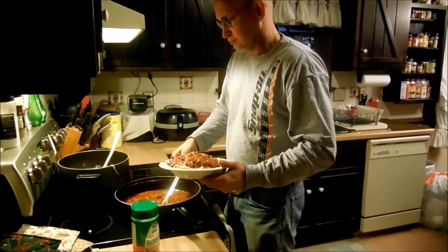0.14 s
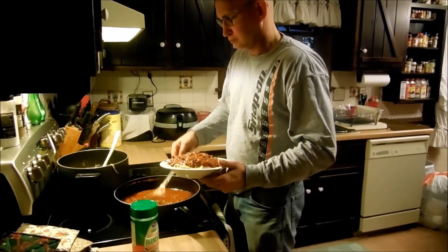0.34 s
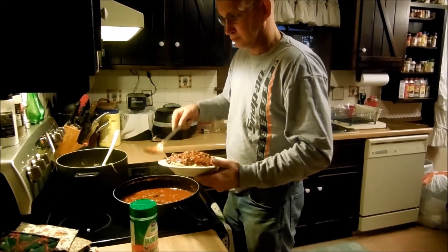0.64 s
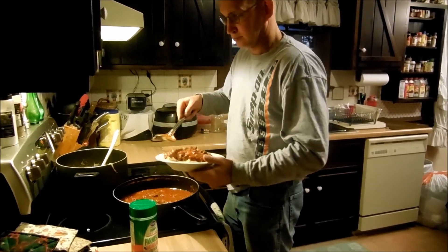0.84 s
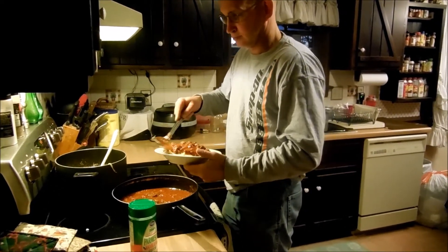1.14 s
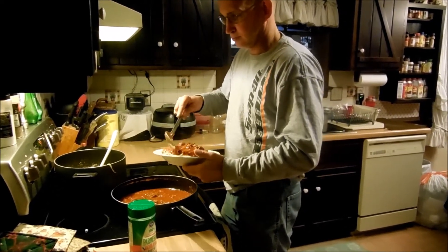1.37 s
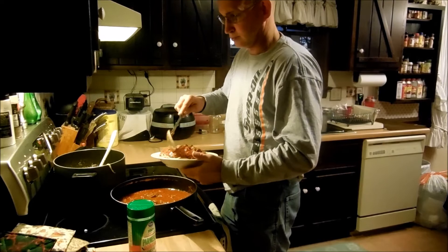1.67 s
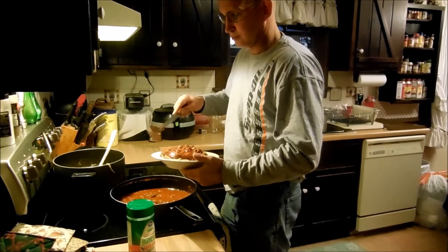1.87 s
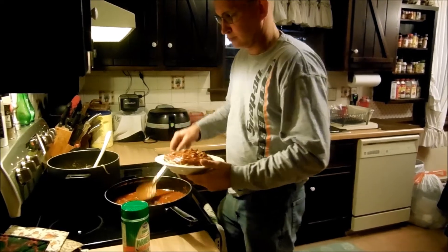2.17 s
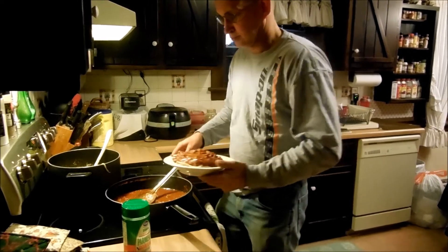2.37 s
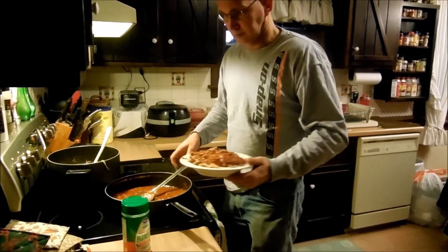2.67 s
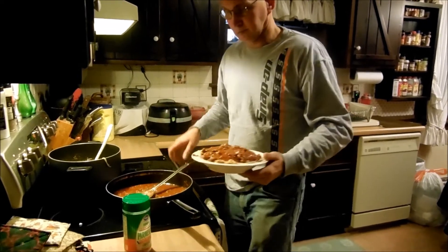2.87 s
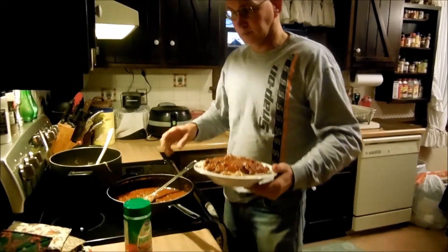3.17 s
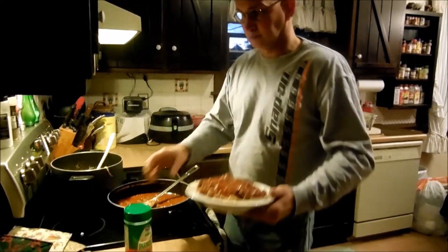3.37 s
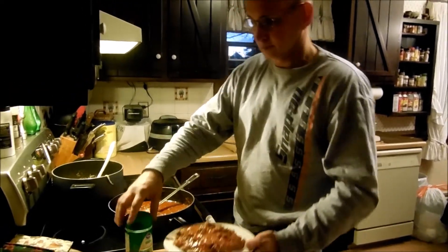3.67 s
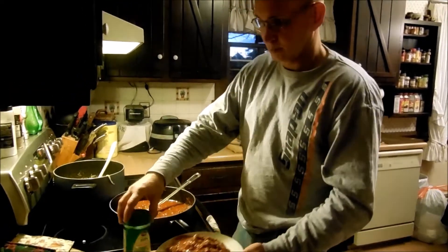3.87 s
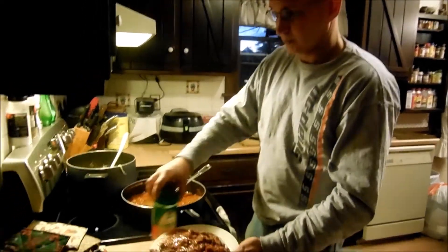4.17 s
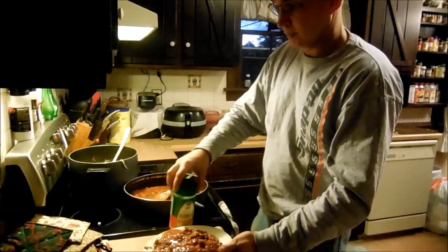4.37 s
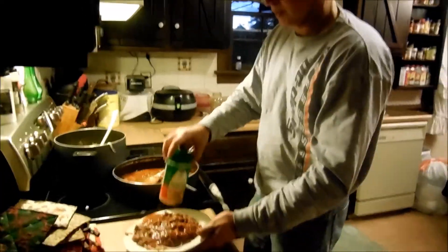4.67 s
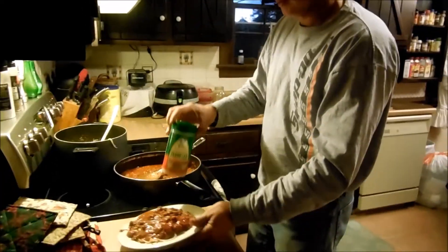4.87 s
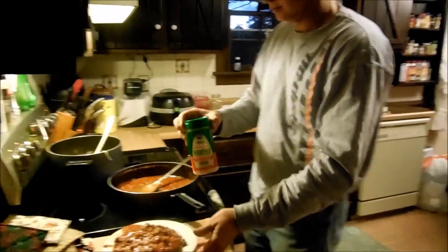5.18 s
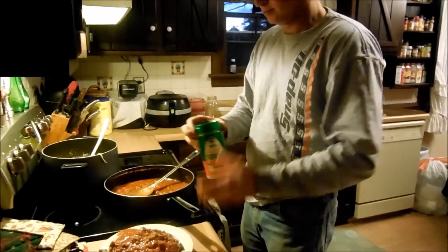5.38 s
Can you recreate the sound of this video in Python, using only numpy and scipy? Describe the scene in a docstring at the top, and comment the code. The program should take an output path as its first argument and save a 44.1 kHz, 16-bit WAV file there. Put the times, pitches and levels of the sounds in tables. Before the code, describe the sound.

Close stereo pickup of serving food at a stove. Soft rubbing and a low pan knock come first, followed by a metallic ring, a pause with tiny ticks, and a light spoon rattle. The second half is louder: double plate clink, shaker bump, brief lid scrape, counter knocks, then a board thud. Constant fan hum and rushing air, with short reflections from the walls.

```python
"""A spoon knocks and rings on a saucepan, then rattles on its rim, in a small kitchen.
A plate clinks and slides, a shaker bumps and its lid scrapes, and things land on counter and board.
Each blow sounds an object's own tones over a burst of dense noise; rubbing is a run of tiny blows.
Small ticks fall between and the walls throw everything back. Behind it a three-bladed fan hums:
steady tones locked to its shaft and the mains, over rushing air."""
import sys
import numpy as np
from scipy import signal
from scipy.fft import rfft, irfft, next_fast_len
from scipy.io import wavfile

SR = 44100
rng = np.random.default_rng(int(sys.argv[2]) if len(sys.argv) > 2 else 0)


def store_wav(level_fs):
    """Save 16-bit WAV to argv[1]."""
    pcm = np.round(np.clip(np.atleast_2d(level_fs), -1, 1) * 32767)
    wavfile.write(sys.argv[1], SR, pcm.T.astype(np.int16))


N = 243423  # length in samples


def amp(db):
    """Turns decibels into a plain multiplier."""
    return 10 ** (np.asarray(db) / 20)


def evened(x):
    """Scales a signal to an average (rms) strength of 1."""
    return x / np.sqrt(np.mean(x ** 2) + 1e-20)


def read(points, hz):
    """Reads a curve between its points, along a logarithmic pitch scale."""
    f, value = np.transpose(points)
    return np.interp(np.log(hz + 1), np.log(f + 1), value)


def add(mix, s, sound):
    """Adds a sound to the mix from s seconds on, cut at the end of the mix."""
    part = mix[:, round(s * SR):][:, :sound.shape[1]]
    part += sound[:, :part.shape[1]]


def coloured(x, db_at):
    """Filters along the last axis by a gain in dB given as a function of Hz."""
    size = next_fast_len(x.shape[-1])
    gain = amp(db_at(np.fft.rfftfreq(size, 1 / SR)))
    return irfft(rfft(x, size) * gain, size)[..., :x.shape[-1]]


# How alike spread-out sound is on left and right. Each row: pitch in Hz, likeness from 0 to 1.
LIKENESS = [(60, 0.89), (300, 0.93), (700, 0.87), (1400, 0.74), (3100, 0.31), (6800, .02)]


def paired(x):
    """Makes two unrelated signals alike in the bass and apart in the treble."""
    same = read(LIKENESS, np.fft.rfftfreq(x.shape[1], 1 / SR))
    a, b = rfft(x)
    return irfft(np.array([a, same * a + np.sqrt(1 - same ** 2) * b]), x.shape[1])


# An object's body has four parts: its single tones, the spectrum of the dense tones between them,
# the level of those dense tones in dB against the single ones, and their ring time in seconds.
# Ring time is the time to fall by 60 dB; each blow or rub takes its own share of it.

# The saucepan's single tones. Each row: pitch in Hz, level in dB, ring time in seconds.
PAN_TONES = [(748, -13., .5), (1200, -3., .55), (1647, -7., .55), (2105, -6., .075), (2439, -10., .25),
             (2509, -9., .25), (2616, -5., .3), (2720, -2., .08), (2848, -3., .25), (3160, -5., .12),
             (4527, -18., .1), (5243, -16., .12)]
# The rest of the pan: dense spectrum (pitch in Hz, level in dB), dense level in dB, ring time in s.
PAN_DENSE = ([(88, -47), (150, -20), (753, -2.5), (1020, -15), (1190, -5), (2260, -33), (2690, -11.5),
              (4230, -20), (5220, -25), (14000, -60)], 2.1, 0.1)


def pan():
    """The saucepan rings long, with many separate metal tones."""
    return play("pan", (PAN_TONES, *PAN_DENSE))


# The pan struck under the sauce: tones (pitch in Hz, level in dB, ring time in s),
# dense spectrum (pitch in Hz, level in dB), dense level in dB, dense ring time in s.
FULL_PAN_BODY = ([(270, -10, 0.091), (625, -10, 0.11), (1028, -8., 0.08), (1310, -1.5, 0.049),
                  (1602, -6, 0.12), (2660, -17, 0.041), (3600, -13.5, 0.023)], [(71, -47), (120, -7),
                  (503, 0), (614, 2.5), (845, -13), (1280, -9), (1420, 3.5), (1600, -19), (2110, -22),
                  (3080, -12.5), (14000, -60)], 3.5, 0.04)


def full_pan():
    """The pan struck under the sauce gives a lower, shorter knock."""
    return play("full pan", FULL_PAN_BODY)


# The spoon: tones (pitch in Hz, level in dB, ring time in s),
# dense spectrum (pitch in Hz, level in dB), dense level in dB, dense ring time in s.
SPOON_BODY = ([(600, -6.5, 0.3), (1230, 5.5, 0.045), (1440, -26, 0.049), (1867, -8, 0.14),
               (2374, -7.5, 0.17), (2660, -7, 0.072), (2974, 3, 0.047), (3280, -1, 0.046),
               (3380, -17, 0.093), (4210, -14, 0.16), (4880, -7, 0.059), (5150, -5, 0.05), (6080, -5, 0.04),
               (7540, -6, 0.059)], [(88, -13), (150, 4), (359, -25), (611, 4.5), (725, -18), (1000, -23),
               (1260, -0.5), (2220, -12.5), (2790, -4), (3500, -4), (3780, -24), (6310, -14),
               (11600, -19.5), (14000, -38)], 0.8, 0.051)


def spoon():
    """The spoon rattles on the rim with short, bright metal tones."""
    return play("spoon", SPOON_BODY)


# The plate's single tones. Each row: pitch in Hz, level in dB, ring time in seconds.
PLATE_TONES = [(716, -12., .1), (1017, -19., .2), (1334, -10., .1), (1510, -8., .15), (1575, -7., .2),
               (1895, -4., .2), (2367, -12., .1), (2634, -2., .5), (2712, -8., .3), (2748, -3., .42),
               (3090, -8., .15), (3838, -12., .08), (4300, -9., .45), (5717, -11., .07), (6880, -10., .06),
               (8500, -18., .04)]
# The rest of the plate: dense spectrum (pitch in Hz, level in dB), dense level in dB, ring time in s.
PLATE_DENSE = ([(88, -57.5), (150, -40), (402, -31.5), (711, -7.5), (844, -29), (1040, -10), (2400, -9.5),
                (2690, -2), (3440, -12), (4320, -14.5), (12300, -33), (14000, -41)], 0.6, 0.25)


def plate():
    """The plate clinks with many separate tones, and slides."""
    return play("plate", (PLATE_TONES, *PLATE_DENSE))


# The shaker: tones (pitch in Hz, level in dB, ring time in s),
# dense spectrum (pitch in Hz, level in dB), dense level in dB, dense ring time in s.
SHAKER_BODY = ([(627, -3.5, 0.13), (1292, -3, 0.12), (1568, -2, 0.071), (2550, -10, .05),
                (3230, -2.5, 0.032), (3950, -8, .03)], [(59, -49), (100, -16), (670, -4), (1300, -9.5),
                (1440, -8), (1560, -5), (1810, -16.5), (3290, -14), (8700, -33), (14000, -56)], 3.5, 0.064)


def shaker():
    """The shaker bumps: short tones under a stronger crowd of dense ones."""
    return play("shaker", SHAKER_BODY)


# The shaker's lid: tones (pitch in Hz, level in dB, ring time in s),
# dense spectrum (pitch in Hz, level in dB), dense level in dB, dense ring time in s.
LID_BODY = ([(1290, -1, 0.022), (3000, -1, 0.022), (5650, -3, 0.045), (7140, -12, 0.025), (9070, -8, .03),
             (9800, -13., 0.04), (12600, -10, 0.037)], [(71, -37), (120, -8), (537, -7.5), (655, -10),
             (724, 0), (1240, -2), (2090, -8.5), (3050, -7), (4030, -10.5), (5440, -7.5), (12600, -16),
             (14200, -27)], 5.9, 0.033)


def lid():
    """The lid scrapes: mostly dense noise, gone in a few hundredths of a second."""
    return play("lid", LID_BODY)


# The counter: tones (pitch in Hz, level in dB, ring time in s),
# dense spectrum (pitch in Hz, level in dB), dense level in dB, dense ring time in s.
COUNTER_BODY = ([(257, -7.5, 0.25), (440, -31, 0.071), (790, -39, 0.13), (806, 0.5, 0.26),
                 (910.5, -6.5, 0.27), (1079, -5, 0.19), (1261, -11.5, 0.27), (1454, -10, 0.17),
                 (1740, -18, 0.21), (2120, -15.5, 0.16), (2260, -21, 0.16), (2475, -9, 0.08),
                 (2552, 0, 0.052), (4300, -16.5, .1)], [(59, -53), (100, -61), (233, -20.5), (684, -6),
                 (807, -12), (993, -11.5), (1270, -6), (2090, -23.5), (2410, -21), (11600, -41.5),
                 (14000, -59)], 0.5, 0.25)


def counter():
    """Things set down on the counter give a dull knock."""
    return play("counter", COUNTER_BODY)


# The board: tones (pitch in Hz, level in dB, ring time in s),
# dense spectrum (pitch in Hz, level in dB), dense level in dB, dense ring time in s.
BOARD_BODY = ([(224, -15, 0.3), (515, -5, 0.22), (589, -10, 0.16), (730, -4, 0.08), (858, -2, 0.088),
               (932, -4, 0.13), (1236, -16.5, 0.22), (1570, -5.5, 0.088), (1565, -6, 0.093),
               (2030, -21, 0.11), (2530, -29, 0.13), (3080, -14, 0.1), (4544, -18.5, 0.11)], [(59, -67),
               (100, -60), (224, -3.5), (376, -35), (491, -9), (728, -6.5), (1120, -15), (1600, -16),
               (1810, -16.5), (4580, -34), (14000, -59)], 1.4, 0.22)


def board():
    """Things set down on the board give a dull, low knock."""
    return play("board", BOARD_BODY)


# Noise of a tick. Each row: multiple of the tick's pitch, level in dB.
CRUMB_NOISE = [(.1, -18.), (.35, -9), (1.1, 10), (2.2, -4.5), (4., -14)]
# Each row: start in seconds, level in dB (before the cut in strikes), pitch in Hz, ring time in seconds,
# hardness in dB per octave, left minus right in dB.
TICK_ROWS = [(2.4556, -41, 3920, 0.022, 2.5, 8), (2.768, -49, 3940, 0.03, -3, -4),
             (3.3375, -46, 3800, 0.015, -6, -1.1), (3.8382, -35, 2590, .025, -4, -1.1),
             (4.2557, -47.5, 5530, 0.024, -1.5, 1.1), (5.028, -48, 6600, .006, .1, 1.5),
             (5.0432, -29., 6640, 0.005, -1.5, 1.5)]


def ticks():
    """Tiny contacts: each has one short tone, and noise that follows its pitch."""
    out = np.zeros((2, N))
    for s, db, hz, t60, hard_db, pan_db in TICK_ROWS:
        noise = [(k * hz, level_db) for k, level_db in CRUMB_NOISE]
        crumb = [(hz, -3., t60)], noise, 4., t60
        out += strikes(crumb, [(s, db, hard_db, 1, pan_db)])
    return out


# The rustle: tones (pitch in Hz, level in dB, ring time in s),
# dense spectrum (pitch in Hz, level in dB), dense level in dB, dense ring time in s.
RUSTLE_BODY = ([(9200, -3., .03), (7300, -3., .02)], [(2000, -20.), (4500, -1), (8500, 3), (13000, -12)],
                9., .012)


def rustle():
    """A faint bright rustle, made of rubbing alone."""
    return play("rustle", RUSTLE_BODY)


def play(name, body):
    """All that one object does: its blows and its rubbing."""
    return blows(name, body) + rubs(name, body)


# Each row: object, start in seconds, level in dB (before the cut in strikes), hardness in dB per octave,
# share of ring time, left minus right in dB.
BLOW_ROWS = [("full pan", 0.4146, -17, 1.1, 0.51, 0.74), ("full pan", .4285, -22, -1.1, 0.17, 1.5),
             ("pan", 0.6263, -22.5, 2.6, 0.76, -1.1), ("spoon", 3.0095, -26.5, .7, 1.01, .3),
             ("plate", 4.0043, -6.5, 2.2, 0.29, -.51), ("plate", 4.0776, -8.5, -1.6, 0.27, 0.36),
             ("board", 4.3205, -39, 0.49, 0.19, 1.6), ("plate", 4.427, -41, -10.5, 0.7, 1.5),
             ("shaker", 4.5139, -8, 2.5, 0.6, 0.33), ("shaker", 4.527, -16, -1.1, 0.85, 1.2),
             ("counter", 4.7865, -4.5, -0.6, 0.48, 1.1), ("counter", 4.8, -12, -2.1, 0.51, 1.1),
             ("counter", 4.874, -13, -2.1, 0.38, 1.1), ("board", 5.3225, -22, -1.2, 0.37, 0.76),
             ("board", 5.3528, -7, 0.4, 0.51, 0.51), ("board", 5.372, -10.5, -1.7, 0.44, 1.1)]


def blows(name, body):
    """The single strikes on one object."""
    return strikes(body, [row[1:] for row in BLOW_ROWS if row[0] == name])


def strikes(body, rows):
    """Lets a body ring once for each row, leaning left or right."""
    out = np.zeros((2, N))
    for s, db, hard_db, damp, pan_db in rows:
        side_db = np.array([[pan_db / 2], [-pan_db / 2]])
        level_db = db - 5.0 + side_db  # all strikes are cut by 5 dB
        add(out, s, amp(level_db) * ring(body, hard_db, damp))
    return out


# Each row: object, start in seconds, swell in seconds, fade in seconds, peak level in dB,
# level at the end of the fade in dB against the peak, hardness in dB per octave.
RUB_ROWS = [("rustle", 0.0, 0, .3, -63, -6, .2), ("full pan", .02, .018, .03, -50.5, -17, .4),
            ("full pan", .17, .065, .07, -49, -13, 3.2), ("full pan", .416, 0, .018, -28.5, -1.5, -.6),
            ("spoon", 3.008, .03, .022, -28, -18, .6), ("spoon", 3.055, 0, .09, -43, -6, -3.5),
            ("board", 3.338, .012, .03, -46, -18, 1.8), ("plate", 4.015, 0, .06, -21.5, -10.5, .6),
            ("plate", 4.085, 0, .054, -24, -12, -.6), ("board", 4.325, 0, .035, -39, -8, -8.5),
            ("plate", 4.4, .03, .02, -53, -11, 1.5), ("lid", 4.555, .02, .07, -23, -19, -.5),
            ("counter", 4.82, 0, .05, -22, -14, -1.1), ("counter", 4.885, 0, .045, -27, -18, -1.5),
            ("board", 5.22, .06, .03, -44, -1.5, .4), ("board", 5.38, 0, .05, -20.5, -27, .48)]
# For each rubbed object: slips per second, spread of their size in dB, share of ring time left.
SURFACES = {"full pan": (900, 2.5, .31), "spoon": (1400, .73, .53), "plate": (2500, 2.8, .043),
            "lid": (2000, 3.6, .68), "counter": (990, 3.2, .55), "board": (900, 3.2, .15),
            "rustle": (3000, 2.5, .9)}
SWELL_DB = -8.5  # a swell starts this far under its peak


def rubs(name, body, spots=4):
    """Uneven slips and bounces land on a few spots of an object that the contact damps."""
    out = np.zeros((2, N))
    for s, swell, fade, peak_db, fade_db, hard_db in [row[1:] for row in RUB_ROWS if row[0] == name]:
        slips_per_s, spread_db, damp = SURFACES[name]
        t = np.arange(0, swell + fade, 1 / SR)
        level_db = peak_db + np.interp(t, [0, swell, t[-1]], [SWELL_DB, 0, fade_db])
        slipping = rng.random(len(t)) < slips_per_s / SR
        size = np.minimum(rng.exponential(1, len(t)), 3)
        spot = rng.integers(0, spots, len(t))
        slips = evened(slipping * amp(spread_db * size))
        push = slips * amp(level_db) * signal.windows.tukey(len(t), .15)
        for k in range(spots):
            answer = ring(body, hard_db, damp)[:, :SR // 5]
            answer = answer / np.linalg.norm(answer[0])
            add(out, s, signal.fftconvolve((push * (spot == k))[None], answer, axes=1))
    return out


def ring(body, hard_db, damp):
    """One blow's answer at both microphones: single tones, unevenly struck, over a dying dense crowd."""
    modes, dense, dense_db, dense_t60 = body
    t = np.arange(SR // 3) / SR

    def hardness(hz):
        """Tilts the level towards treble (hard) or bass (soft), around 1500 Hz."""
        return hard_db * np.log2(np.maximum(hz, 60) / 1500)

    tones = np.zeros((2, len(t)))
    for hz, db, t60 in modes:
        spot_db, skew, turn = rng.standard_normal(3)
        level_db = db + hardness(hz) + spot_db  # where the blow lands favours some modes
        lag = np.array([[0], [skew * hz / 7000]]) + turn  # high modes beam unevenly at the two sides
        tones += amp(level_db - 60 * t / (damp * t60)) * np.sin(2 * np.pi * hz * t + lag)

    noise = rng.standard_normal((2, len(t)))
    crowd = coloured(paired(noise) + 0.82 * noise[0], lambda hz: read(dense, hz) + hardness(hz))
    dull = signal.lfilter([.25], [1, -.75], crowd)
    fall_db = -60 * t / (damp * dense_t60)
    crowd = dull * amp(fall_db) + (crowd - dull) * amp(1.61 * fall_db)  # the treble dies sooner
    crowd += amp(-1.5) * (crowd - dull) * np.exp(-t / .0015)  # the first crack of contact

    start = SR // 200  # levels are set by the first 5 ms
    both = tones / np.std(tones[:, :start]) + amp(dense_db) * crowd / np.std(crowd[:, :start])
    return both * np.minimum(t / 0.00048, 1) / np.std(both[:, :start])


# Time for echoes to fall by 60 dB. Each row: pitch in Hz, time in seconds.
ECHO_TIMES = [(150, 0.34), (600, 0.29), (2000, 0.27), (6000, 0.24), (13000, 0.17)]


def kitchen(x):
    """Echoes off the walls: sparse taps of random sign, each band dying at its own speed."""
    first = 160  # samples before the first echo
    taps = np.zeros((2, SR // 2))
    at = np.arange(first, SR // 2 - 20, 20)
    at = at + rng.integers(0, 20, (2, len(at)))
    np.put_along_axis(taps, at, rng.choice([-1., 1.], at.shape), 1)
    hz, t, bands = signal.stft(paired(taps), SR, nperseg=256)
    fading = bands * amp(-60 * t / read(ECHO_TIMES, hz)[:, None])
    tail = signal.istft(fading, SR, nperseg=256)[1]
    tail[:, :first] = 0
    return signal.fftconvolve(x.mean(0)[None], tail / np.linalg.norm(tail[0]), axes=1)[:, :N]


# Hum of the mains. Each row: pitch in Hz, rms level in dB.
MAINS_TONES = [(60., -78.), (120., -66.)]
# Tones of the turning shaft. Each row: multiple of the shaft speed, rms level in dB.
SHAFT_TONES = [(2, -66), (3, -63), (4, -62), (5, -73), (6, -69), (7, -74), (8, -75), (11, -78), (13, -74),
               (14, -72), (15, -70), (16, -64), (18, -75), (19, -66), (20, -75), (22, -71)]
# Loudest tones one magnetic pull away from a shaft multiple.
# Each row: shaft multiple, side (-1 below or 1 above), rms level in dB.
SIDE_TONES = [(2, 1, -71), (12, 1, -68), (13, 1, -74), (14, -1, -72), (14, 1, -74), (15, 1, -73),
              (17, -1, -66), (18, -1, -75), (18, 1, -75), (19, -1, -73), (19, 1, -73), (20, -1, -75)]
# Colour of the rushing air. Each row: pitch in Hz, level in dB per Hz, before the whole is set to AIR_DB.
AIR_COLOUR = [(12, -50), (20, -14.5), (115, -8.5), (300, -5.5), (353, -4.5), (416, -9), (547, -8),
              (681, -6), (946, -8), (1030, -13), (1470, -13), (1630, -9), (3420, -22), (11400, -32),
              (13800, -46)]
# Steep loss of treble above 13.6 kHz, applied to the air and again to the whole mix.
# Each row: pitch in Hz, gain in dB.
TREBLE_LOSS = [(13600, 0.), (14100, -16.), (16000, -22.)]
SHAFT_HZ, BLADES = 43.07, 3
PULL_HZ, PULL_TURNS = 120., .11  # magnetic pull of the mains, and its lead in turns
FAINT_FROM, FAINT_TO = 5, 21  # these shaft multiples carry weak side tones wherever no loud one is listed
FAINT_DB, FAINT_SPREAD_DB = -81, 2.5
AIR_DB = -54.5  # rms level


def fan():
    """Shaft multiples with mains side tones, over rushing air that throbs nine times a second."""
    t = np.arange(N) / SR
    shaft = 2 * np.pi * SHAFT_HZ * t
    pull = 2 * np.pi * (PULL_HZ * t + PULL_TURNS)
    blade = rng.uniform(0, 2 * np.pi, BLADES)

    loud = [(k, side) for k, side, db in SIDE_TONES]
    faint = []
    for k in range(FAINT_FROM, FAINT_TO + 1):
        for side in (-1, 1):
            if (k, side) not in loud:
                faint.append((k, side, FAINT_DB + FAINT_SPREAD_DB * rng.standard_normal()))

    tones = sum(amp(db) * np.cos(2 * np.pi * hz * t) for hz, db in MAINS_TONES)
    for k, side, level_db in [(k, 0, db) for k, db in SHAFT_TONES] + SIDE_TONES + faint:
        phase = blade[k % BLADES] + 0.93 * rng.standard_normal()
        tones += amp(level_db) * np.cos(k * shaft + side * pull + phase)

    air = paired(rng.standard_normal((2, N)))
    air = coloured(air, lambda hz: read(AIR_COLOUR, np.minimum(hz, 12000)) + read(TREBLE_LOSS, hz))
    air = amp(AIR_DB) * evened(air)
    throb = 0.18 * np.cos(BLADES * shaft - pull - 1.5)  # three shaft turns against one pull: 9 Hz
    throb += 0.043 * np.cos(shaft) + 0.089 * np.cos(2 * shaft)
    housing_colour = [(500, -41.0), (1200, -2.0), (2800, -9.5), (5000, -20.)]  # Hz, dB
    housing = coloured(air, lambda hz: read(housing_colour, hz))
    left, right = np.sqrt(2) * tones + air + throb * housing  # the housing buzzes in step with the throb
    return np.array([left, np.roll(right, 1)])  # the fan stands further left


# Places with their own echoes. Each row: names of the objects there, echo level in dB.
PLACE_ROWS = [(("pan", "full pan"), -8), (("counter",), -8), (("spoon", "plate"), -9), (("shaker", "lid"),
              -6), (("board",), -8.5), (("rustle", "ticks"), -9.5)]


def scene():
    """Each place rings with its own echoes, over the fan."""
    sources = {"pan": pan, "full pan": full_pan, "spoon": spoon, "plate": plate, "shaker": shaker,
               "lid": lid, "counter": counter, "board": board, "ticks": ticks, "rustle": rustle}
    clatter = np.zeros((2, N))
    for names, echo_db in PLACE_ROWS:
        part = sum(sources[name]() for name in names)
        clatter += part + amp(echo_db) * kitchen(part)
    no_bass = signal.butter(3, 173, "high", fs=SR, output="sos")  # small things radiate no deep bass
    return signal.sosfilt(no_bass, clatter) + fan()


# Balance of the microphone pair. Each row: pitch in Hz, left minus right in dB.
BALANCE = [(60, 2), (240, 1.5), (950, 1.5), (3770, 0), (15000, 1.5)]
FULL_SCALE = 0.94  # the input stage rounds off the highest peaks
EDGE_HZ = 16500  # band limit


def record(dry):
    """The left side hears a little louder and sooner; peaks round off; treble drops steeply, then stops."""
    left = coloured(dry[0], lambda hz: read(BALANCE, hz) / 2)
    right = coloured(dry[1], lambda hz: -read(BALANCE, hz) / 2)
    sides = np.array([left, np.roll(right, 1)])
    rounded = FULL_SCALE * np.tanh(sides / FULL_SCALE)
    heard = coloured(rounded, lambda hz: read(TREBLE_LOSS, hz))
    band_limit = signal.firwin(511, EDGE_HZ, window=("kaiser", 9), fs=SR)
    return signal.oaconvolve(heard, band_limit[None], "same")


dry = scene()
out = record(dry)
store_wav(out)
```